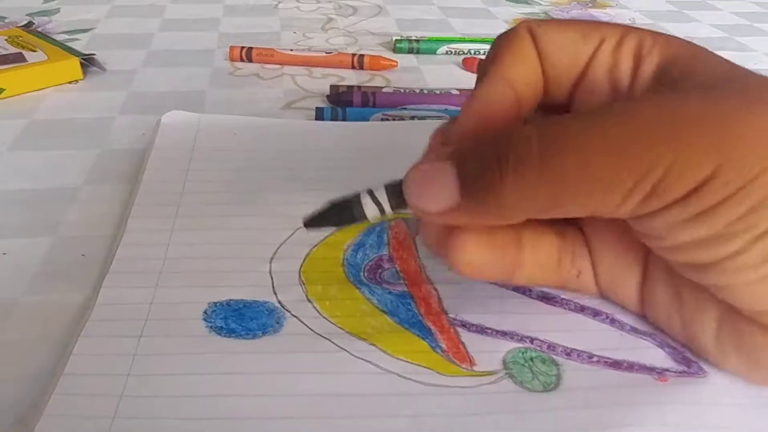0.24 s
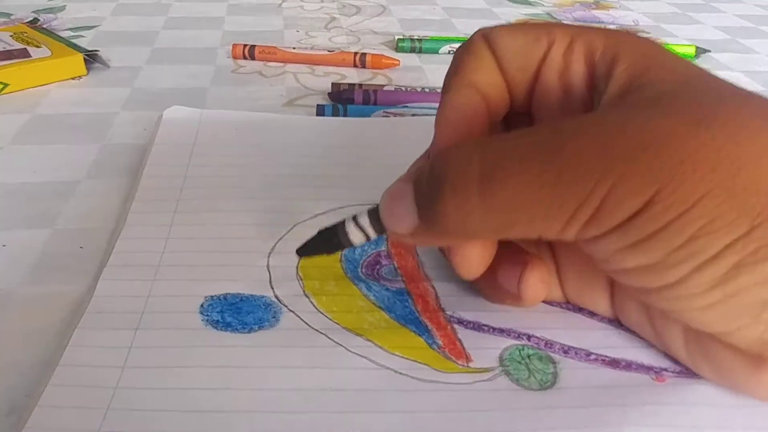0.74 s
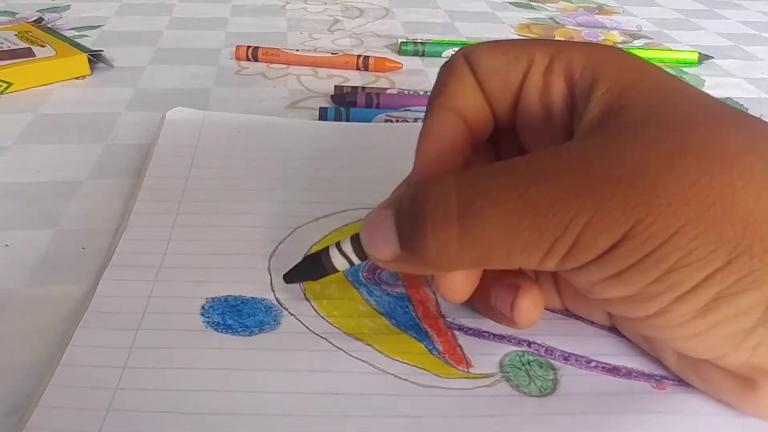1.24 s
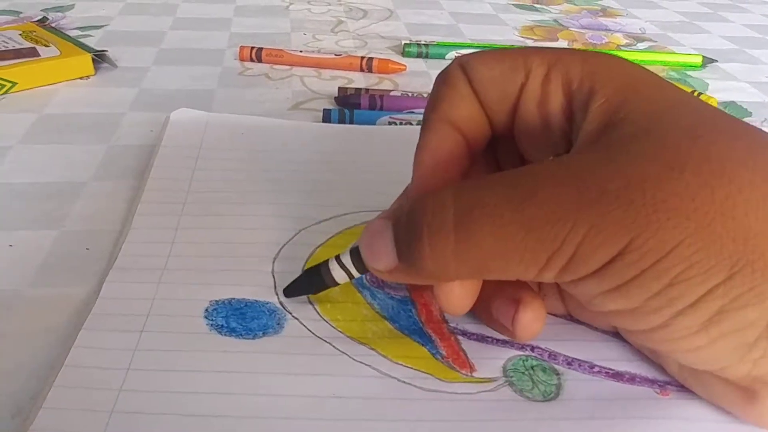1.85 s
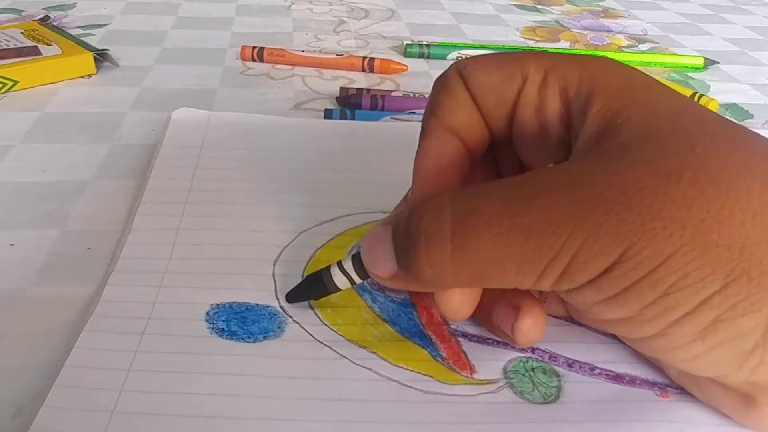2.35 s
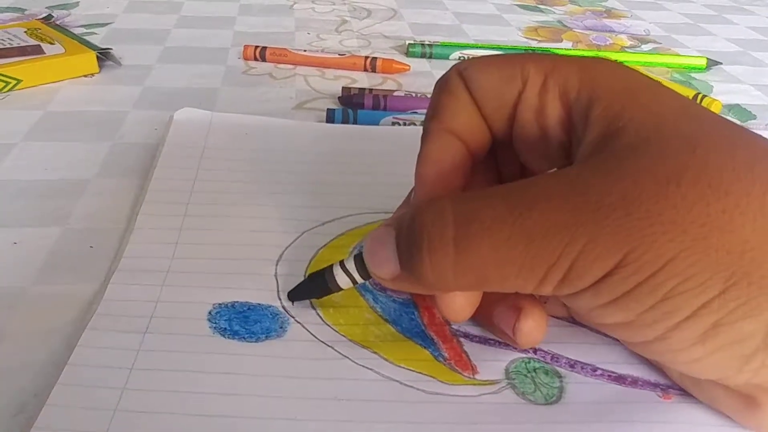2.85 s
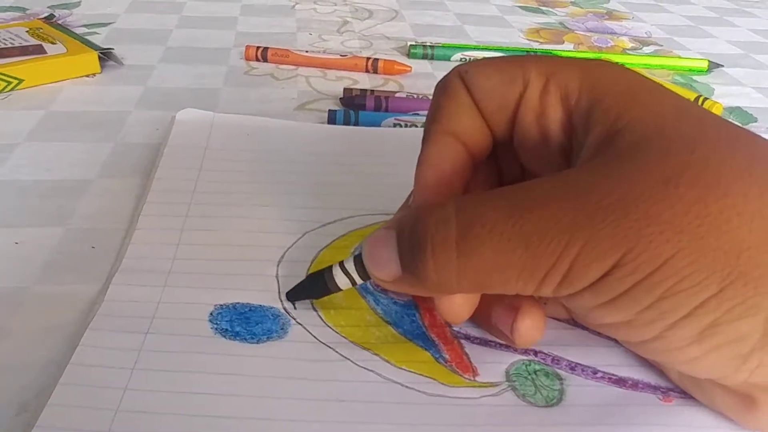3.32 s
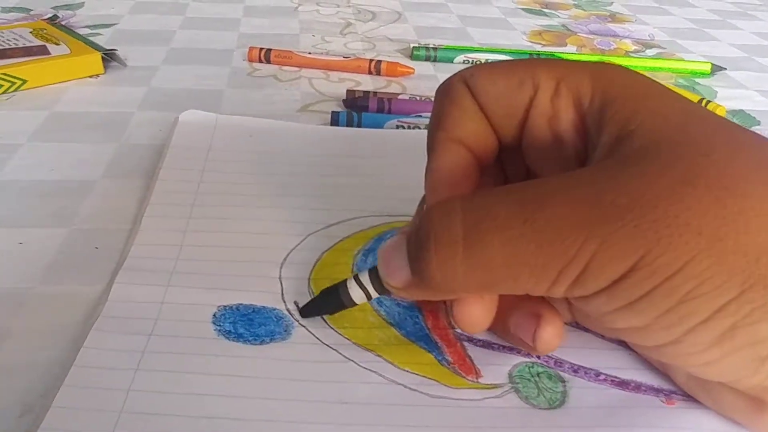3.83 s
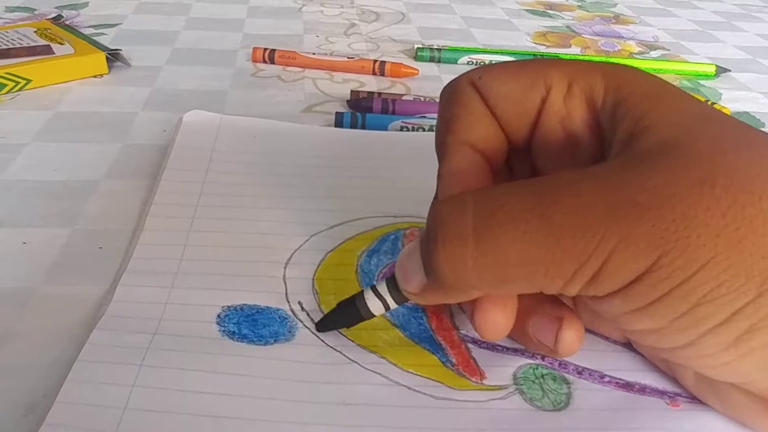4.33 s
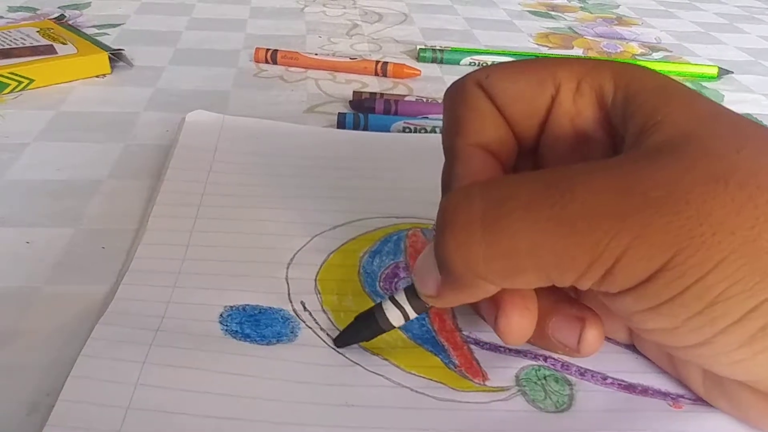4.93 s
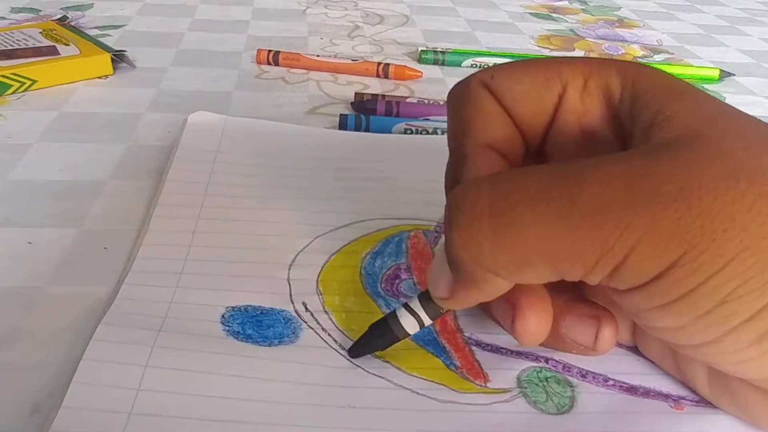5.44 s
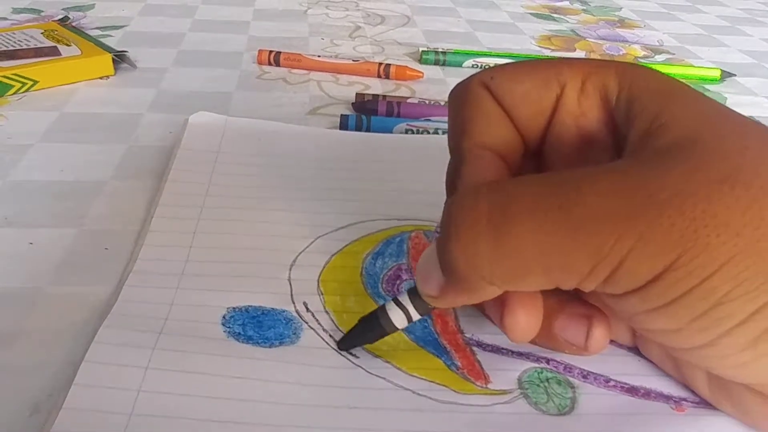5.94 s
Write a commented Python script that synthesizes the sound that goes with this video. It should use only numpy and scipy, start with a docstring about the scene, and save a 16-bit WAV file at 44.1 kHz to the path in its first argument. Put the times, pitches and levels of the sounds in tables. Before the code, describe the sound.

Quiet indoor hush with barely audible crayon rubs on paper. Then loud, hollow wooden knocks arrive from a distance as blurred echoes, evenly spaced, with a short gap midway and feeble dull knocks near the end. Muffled bassy air thumps hit the phone, mostly on the right, strongest near the end. Left channel is duller, right brighter and slightly hissy.

```python
"""Something wooden is knocked again and again, some way off in a bare room; each blow arrives as echo.
Each blow is a bundle of wood resonances sent through dying noise. Nearer, a crayon whispers over paper,
made of gritty noise under smooth strokes. Puffs of moving air buffet one port of a phone, over a low
rumble, and the room murmurs faintly: both are shaped noise.
The two ports differ: the left is dull and late, the right has a bright resonance."""
import sys
import numpy as np
from scipy import signal
from scipy.fft import rfft, irfft, next_fast_len
from scipy.io import wavfile
from scipy.ndimage import uniform_filter1d, minimum_filter1d, map_coordinates

SR = 44100
rng = np.random.default_rng(int(sys.argv[2]) if len(sys.argv) > 2 else 0)


def magnitude_from_level(level_db):
    """Linear magnitude for a level in decibels (20 dB per decade)."""
    exponent = np.asarray(level_db, float) / 20
    return 10 ** exponent


def unload_audio(sound):
    """Save the sound as a 16-bit wav file, at the path given as the first command line argument."""
    columns = np.transpose(np.atleast_2d(sound))
    # keep every value between -1 and 1, then stretch to whole-number steps
    steps = np.round(np.clip(columns, -1, 1) * 32767)
    wavfile.write(sys.argv[1], SR, steps.astype(np.int16))


N = 272493  # length of the scene in samples


def unit(x):
    """Scaled to rms 1."""
    return x / np.sqrt(np.mean(x ** 2) + 1e-20)


def along(points, hz):
    """Reads a curve of (f/Hz, value) points on a log frequency axis."""
    f, v = np.transpose(points)
    return np.interp(np.log(hz + 1), np.log(f + 1), v)


def over_time(points):
    """Reads a curve of (t/s, value) points at every sample."""
    return np.interp(np.arange(N) / SR, *np.transpose(points))


def wobble(rate):
    """A smooth random curve with this many knots a second."""
    knots = rng.standard_normal(int(N * rate / SR) + 4)
    return map_coordinates(knots, [np.arange(N) * rate / SR])


def filtered(x, response):
    """Gives x a new colour: its spectrum times a response that depends on frequency."""
    n = x.shape[-1]
    m = next_fast_len(n + 8192)  # spare room, so the end does not wrap onto the start
    return irfft(rfft(x, m) * response(np.fft.rfftfreq(m, 1 / SR)), m)[..., :n]


def humps(peaks, hz):
    """The dB that resonances (f/Hz, width/Hz, level/dB) add at each frequency."""
    return sum(db / (1 + (2 * (hz - centre) / width) ** 2) for centre, width, db in peaks)


def causal(gain_db):
    """The response with these gains that rings only after the blow (minimum phase)."""
    c = irfft(gain_db * np.log(10) / 20)
    half = len(c) // 2
    c[1:half] *= 2  # fold the time before the blow onto the time after it
    c[half + 1:] = 0
    return np.exp(rfft(c))


# How alike the sound from all sides is at the two ports. Columns: f/Hz, likeness (0 to 1)
LIKENESS = [(60, 0.851), (200, 1), (500, 0.8552), (900, 0.74), (1500, 0.64), (2400, 0.534), (3500, 0.59),
            (6000, 0.04)]


def diffuse(pair):
    """Two unrelated signals become sound from all sides: alike at the ports in the bass, less so above."""
    def mid_and_side(hz):
        turn = np.arccos(np.clip(along(LIKENESS, hz), 0, 1)) / 2
        return np.array([np.cos(turn), np.sin(turn)])
    mid, side = filtered(pair, mid_and_side)
    return np.array([mid + side, mid - side])


# The blows; thud, board and crack are relative to the middle of the sound, and the note is the
# resonance that the struck spot favours. Levels hold before the ports.
# Columns: t/s, level/dB, thud level/dB, board level/dB, crack level/dB, note f/Hz
BLOWS = [(1.108, -21.5, -9.5, -5, -19, 1327), (1.427, -14.5, -8, -9.5, -17, 1683),
         (1.781, -15, -11, -11.5, -20, 1835), (2.149, -14, -22.5, -6, -12, 1014),
         (2.519, -16.5, -15.5, -7.5, -4.5, 1686), (2.915, -17.5, -19.5, -3.5, -7.5, 1730),
         (3.763, -20, -21.5, -3.5, -12, 1557), (4.096, -17.5, -20, -4, -2.5, 1923),
         (4.443, -18, -25, -5, -4, 1730), (5.091, -36, -7.5, 3.5, -17, 850),
         (5.219, -30, -9.5, 1, -14.5, 553.1), (5.302, -32, -6, 9, -38, 890.4),
         (5.785, -51.5, -11, 11, -3, 950), (6.042, -42.5, -10, -9, -18, 1175)]
# Centres of thud, board, middle, edge and crack. Column: f/Hz
BLOW_BANDS = [170, 560, 1100, 1850, 5000]
# Colour of a blow before its resonances. Columns: f/Hz, relative level/dB
BLOW_COLOUR = [(50, -38), (110, 13), (300, 8.5), (700, 0.5), (1100, 1.5), (2100, -4), (2700, -5.5),
               (4500, -10), (7300, -8.5), (8600, -14.5), (11000, -15), (16000, -21)]
# Usual resonances of the struck wood. Columns: f/Hz, width/Hz, level/dB
WOOD_MODES = [(151.86, 34, 9), (473, 54, 4.5), (621.6, 161.25, 9.5), (950, 27, 6.5), (1225.4, 116, 10.5),
              (1730, 720, 6.5), (2480, 40, -0.5), (3148.1, 730, 1), (5376, 1220, 8)]
EDGE_SHARE, EDGE_DB = 0.59, 2.66  # the edge band takes this share of the crack's dB, plus an offset in dB
NOTE_WIDTH_HZ, NOTE_DB = 70, 9.5
PING = (3470, 280, 6.1)  # a ping in every blow: f/Hz, width/Hz, level/dB


def knocks():
    """Each blow rings the wood at new strengths; the room answers much alike, as the place hardly changes."""
    n = 32768  # samples kept of each blow
    out = np.zeros((2, N + n))
    hz = np.fft.rfftfreq(2 * n, 1 / SR)
    usual = echoes(n)
    for s, db, thud, board, crack, note_hz in BLOWS:
        edge = EDGE_DB + EDGE_SHARE * crack  # a harder blow is brighter here too
        colour = list(zip(BLOW_BANDS, [thud, board, 0, edge, crack]))
        strengths = rng.normal(1, 0.11, len(WOOD_MODES))
        wood = [(f, width, gain * k) for (f, width, gain), k in zip(WOOD_MODES, strengths)]
        spot = [(note_hz, NOTE_WIDTH_HZ, NOTE_DB), PING]
        lesser = 3 * map_coordinates(rng.standard_normal(200), [hz / 130])  # many small modes, new each time
        gain_db = along(BLOW_COLOUR, hz) + along(colour, hz) + humps(wood + spot, hz) + lesser
        answer = .8 * usual + .6 * echoes(n)
        sound = irfft(rfft(answer, 2 * n) * causal(gain_db))[:, :n]
        loudness = np.std(sound[:, :SR // 10])  # taken over the first tenth of a second
        start = round(s * SR)
        out[:, start:start + n] += magnitude_from_level(db) * sound / loudness
    return diffuse(out[:, :N])


# How long the room's echo takes to fall by 60 dB. Columns: f/Hz, t/s
ECHO_TIMES = [(100, 0.5879), (260, 0.38), (700, 0.35), (1840, 0.37), (4850, 0.36), (12800, 0.35637)]


def echoes(n):
    """The room's answer to one blow: echoes thicken at first, then each frequency dies at its own speed."""
    hz, t, z = signal.stft(rng.standard_normal((2, n)), SR, nperseg=256)
    fading = magnitude_from_level(-60 * t / along(ECHO_TIMES, hz)[:, None])
    tail = signal.istft(z * fading, SR, nperseg=256)[1][:, :n]
    t = np.arange(n) / SR
    lumps = unit(uniform_filter1d(rng.standard_normal(n), size=200))
    sparse = magnitude_from_level(3 * lumps * np.exp(-t / .03))  # the first walls come singly, so the start is lumpy
    arrival = 1 - np.exp(-(t / .0055) ** 1.3)  # no direct path: the sound comes round a corner
    filling = 1 - 0.10333 * np.exp(-t / 0.066)  # a little weaker at the start
    return tail * sparse * arrival * filling


# Faint crayon strokes: t is the middle, length is at half strength, level is the crest before the
# ports and f is the centre of the colour. Columns: t/s, length/s, level/dB, f/Hz
CRAYON_STROKES = [(.15, .14, -56, 7000), (0.519, 0.1715, -59, 8000), (.67, 0.074, -57, 5010),
                  (0.876, 0.04095, -56, 4600), (0.989, 0.069, -54, 2530), (1.288, .05, -53, 12000),
                  (1.628, 0.12, -54, 5000), (1.96, 0.13, -71, 6000), (2.8, 0.072, -53, 7000),
                  (3.421, 0.111, -56, 8000), (3.64, .09, -60, 6000), (4.78, 0.081, -57, 5500),
                  (5.101, 0.058, -60, 3600), (5.342, 0.14, -51, 8967), (5.489, 0.0625, -53, 5000),
                  (5.802, 0.0715, -55.5, 4515), (5.87, 0.048, -51, 11400), (6.07, .09, -55, 7000)]


def crayon():
    """Wax drags over the paper's tooth: dense grit under a smooth stroke, each with its own broad colour."""
    out = np.zeros((2, N + SR))
    for s, length, db, centre_hz in CRAYON_STROKES:
        n = round(2 * length * SR)
        grit = rng.standard_normal((2, n)) * magnitude_from_level(5.053 * rng.standard_normal(n))  # uneven grain sizes
        grit = filtered(grit, lambda hz: magnitude_from_level(-9 * np.log2((hz + 1) / centre_hz) ** 2))
        start = round(s * SR) - n // 2
        out[:, start:start + n] += magnitude_from_level(db) * unit(grit) * np.hanning(n)
    return diffuse(out[:, :N])


# Colour of the moving air. Columns: f/Hz, relative level/dB
AIR_COLOUR = [(25, -51), (40, -25), (50, 4), (62, 2), (110, -3), (200, -14), (400, -30), (800, -61),
              (2000, -100)]
# Standing waves of the room, in the rumble and the murmur. Columns: f/Hz, width/Hz, level/dB
ROOM_MODES = [(64.5, 22, 6), (127, 13.75, 11.5), (227.6, 24, 8), (548, 130, 2.5)]
# Low rumble at both ports, before its small random swell. Columns: t/s, level/dB
RUMBLE_LEVEL = [(0, -61), (.8, -51), (1.2, -48.5), (1.55, -39.5), (1.9, -38), (2.08, -53), (2.22, -42),
                (2.45, -45.5), (2.65, -38.5), (3.05, -46.5), (3.2, -52.5), (3.9, -57), (4.3, -65),
                (4.55, -42.5), (4.85, -66), (5.4, -56), (6.18, -54)]
# Puffs of air on the right port: t is the middle, length is at half strength, level is the crest.
# Columns: t/s, length/s, level/dB
AIR_PUFFS = [(0.428, 0.066, -42), (.72, 0.1199, -44), (0.859, 0.08528, -29.5), (0.942, 0.071, -30),
             (1.102, 0.082, -24), (1.248, .05, -33), (1.34, 0.0859, -39), (1.44, 0.0598, -33),
             (1.6, 0.23, -27), (1.762, 0.03317, -28), (1.838, .06, -31), (1.952, 0.1397, -31),
             (2.098, 0.042, -30), (2.155, 0.02496, -27.5), (2.72, 0.098, -41), (3.082, .04, -36.5),
             (3.155, 0.027, -37), (3.715, .03, -32), (3.778, 0.06, -33), (3.9, 0.0569, -33),
             (5.072, 0.045, -27), (5.14, 0.0636, -38), (5.472, 0.074, -39.5), (5.568, 0.03826, -32.5),
             (5.71, .03, -32), (5.773, 0.072, -15.5), (5.839, 0.021, -28), (5.898, 0.055, -25.5),
             (6.001, 0.041, -22.5), (6.052, 0.02772, -25.5), (6.14, 0.064, -37)]
LEAK_DB = -20.5  # how the sheltered left port scales the puffs


def buffet():
    """A low rumble that both ports share, and lumpy puffs of air that push on the exposed right port."""
    noise = rng.standard_normal(N)
    rumble = unit(filtered(noise, lambda hz: magnitude_from_level(along(AIR_COLOUR, hz) + humps(ROOM_MODES, hz))))
    eddies = filtered(rng.standard_normal((2, N + SR)), lambda hz: magnitude_from_level(along(AIR_COLOUR, hz)))
    puffs = np.zeros((2, N + SR))
    for s, length, db in AIR_PUFFS:
        n = round(2 * length * SR)
        start = round(s * SR) - n // 2
        shape = np.hanning(n)
        puff = eddies[:, start:start + n] * shape
        evened = puff * np.linalg.norm(shape) / np.linalg.norm(puff, axis=1, keepdims=True)
        puffs[:, start:start + n] += magnitude_from_level(db) * evened
    swell = magnitude_from_level(over_time(RUMBLE_LEVEL) + 1.3 * wobble(8))
    return swell * rumble + magnitude_from_level([[LEAK_DB], [0]]) * puffs[:, :N]


# Colour of room air and far traffic. Columns: f/Hz, relative level/dB
MURMUR_COLOUR = [(30, -32), (60, 4), (130, -8), (220, -6.5), (320, -11.5), (550, -7.5), (850, -12.5),
                 (1200, -19), (2000, -18), (3000, -21.5), (5000, -21), (7200, -17.5), (8600, -24),
                 (12000, -22), (16000, -26.5)]
# Level of the murmur before its drift and the ports. Columns: t/s, level/dB
MURMUR_LEVEL = [(0, -45.5), (1, -44.5), (2, -43.5), (3.2, -46.5), (4, -45.5), (4.9, -46.5), (6.18, -46)]
DRIFT_DB = .7  # size of the slow random drift


def murmur():
    """The steady hush of the room: shaped noise with faint patches of more and less."""
    z = signal.stft(rng.standard_normal((2, N)), nperseg=512)[2]
    patches = uniform_filter1d(rng.standard_normal(z.shape[1:]), size=6, axis=0)  # smooth over frequency
    patches = uniform_filter1d(patches, size=14, axis=1)  # and over time
    pair = signal.istft(z * magnitude_from_level(1.2 * unit(patches)), nperseg=512)[1][:, :N]
    hush = filtered(pair, lambda hz: magnitude_from_level(along(MURMUR_COLOUR, hz) + humps(ROOM_MODES, hz)))
    level = magnitude_from_level(over_time(MURMUR_LEVEL) + DRIFT_DB * wobble(2.63))
    return level * diffuse(unit(hush))


# How far the left port lags. Columns: f/Hz, lag/rad
LEFT_LAG = [(0, 0), (130, .15), (340, .35), (550, .45), (850, 1.5), (1250, 3.4), (1750, 5.4), (2500, 8.1),
            (3500, 12.3), (16000, 53)]
# Colour of the dull left port. Columns: f/Hz, level/dB
LEFT_COLOUR = [(30, -5.5), (700, 3.5), (1250, 0), (1800, -3.5), (2500, -3), (3500, -5), (5000, -9.5),
               (7300, -8), (8600, -25), (12000, -15), (16000, -25.5)]
# Colour of the bright right port. Columns: f/Hz, level/dB
RIGHT_COLOUR = [(30, -2), (1000, 3), (2500, 1.5), (4000, 7), (6000, 11.5), (7300, 19), (7900, 13.5),
                (8600, 0.5), (9150, -7.5), (10000, -0.5), (12000, -3), (16000, -5)]


def ports(x):
    """Each port colours what comes through the air; the left one also delays it."""
    def response(hz):
        lag = np.exp(-1j * np.interp(hz, *np.transpose(LEFT_LAG)))
        return np.array([magnitude_from_level(along(LEFT_COLOUR, hz)) * lag, magnitude_from_level(along(RIGHT_COLOUR, hz))])
    return filtered(x, response)


# Colour of the circuit noise. Columns: f/Hz, relative level/dB
HISS_COLOUR = [(100, -25.5), (2000, -2), (6000, 4.5), (12000, -14.5), (16000, 2.5)]


def circuit_hiss():
    """Faint electrical noise, separate in each channel and a little stronger on the right."""
    noise = filtered(rng.standard_normal((2, N)), lambda hz: magnitude_from_level(along(HISS_COLOUR, hz)))
    return magnitude_from_level([[-62], [-58]]) * unit(noise)


def limited(x, top):
    """A look-ahead limiter turns both channels down under the loudest peaks."""
    need = np.minimum(top / (np.abs(x).max(axis=0) + 1e-9), 1)
    return x * uniform_filter1d(minimum_filter1d(need, size=441), size=221)  # windows in samples


def scene():
    """Sound through the air passes the ports; the moving air acts on them directly."""
    through_air = knocks() + crayon() + murmur()
    return ports(through_air) + buffet()


def band_limit(x):
    """A steep low-pass at the top of the band."""
    return signal.sosfilt(signal.butter(12, 16380, fs=SR, output="sos"), x)


def record(dry):
    """Adds circuit hiss, cuts everything above the band limit and holds down the peaks."""
    top_hz = 15900
    banded = filtered(dry + circuit_hiss(), lambda hz: hz < top_hz)
    mix = limited(banded, top=.88)
    return band_limit(mix)


dry = scene()
out = record(dry)
unload_audio(out)
```